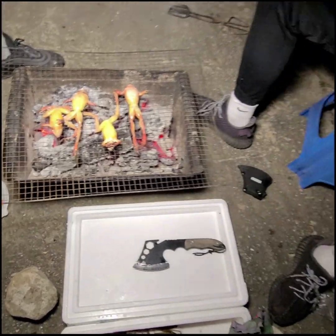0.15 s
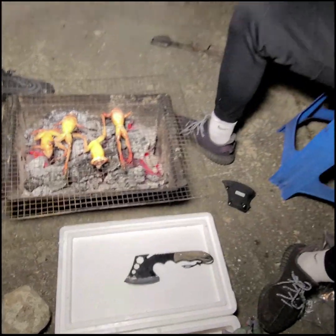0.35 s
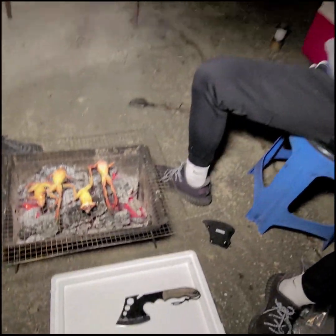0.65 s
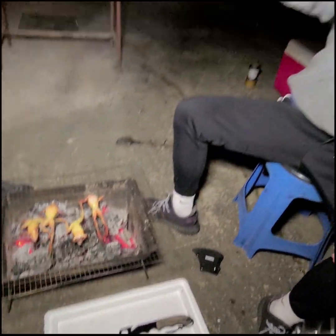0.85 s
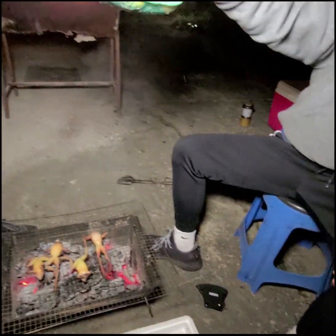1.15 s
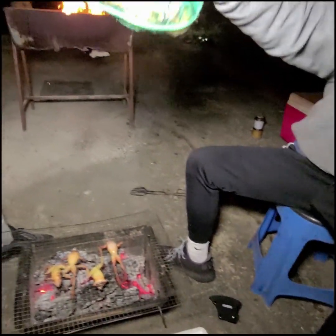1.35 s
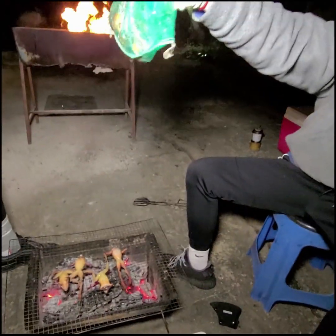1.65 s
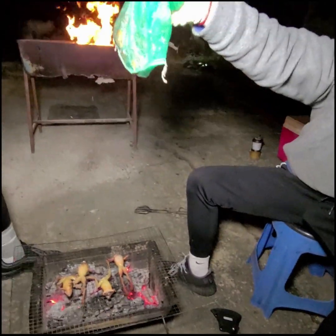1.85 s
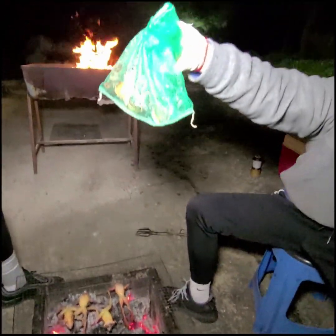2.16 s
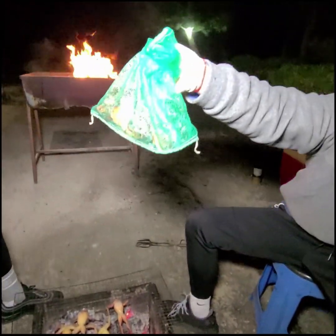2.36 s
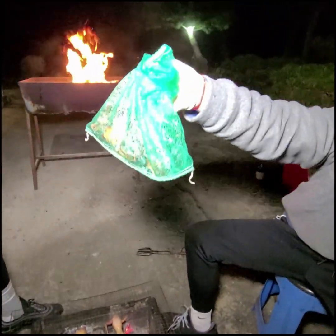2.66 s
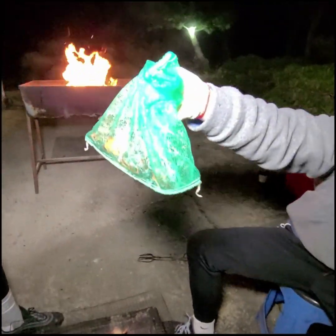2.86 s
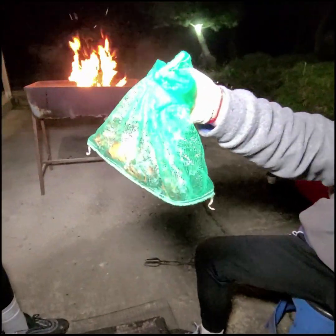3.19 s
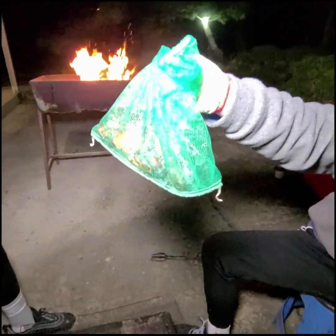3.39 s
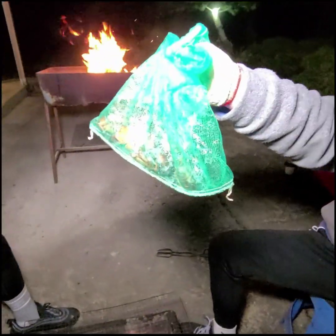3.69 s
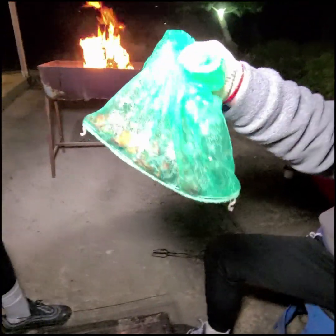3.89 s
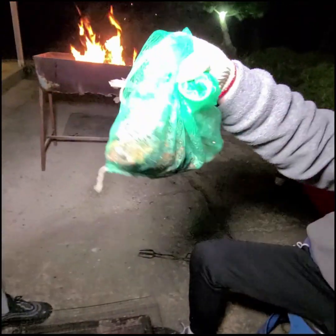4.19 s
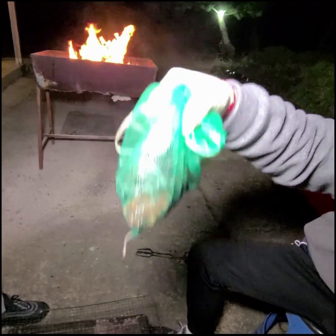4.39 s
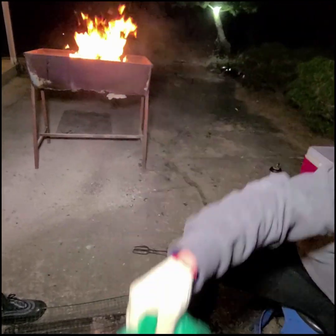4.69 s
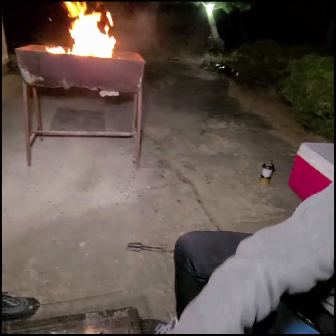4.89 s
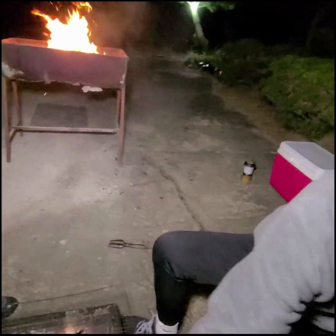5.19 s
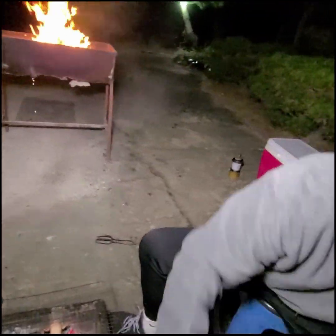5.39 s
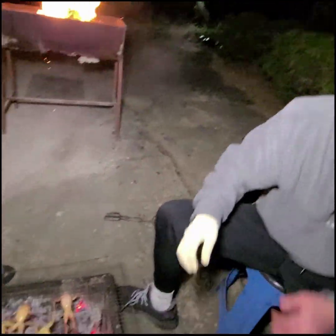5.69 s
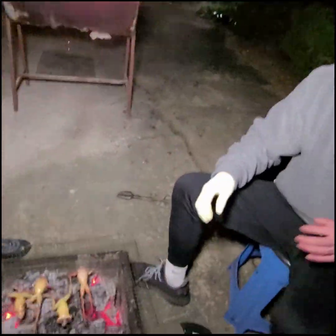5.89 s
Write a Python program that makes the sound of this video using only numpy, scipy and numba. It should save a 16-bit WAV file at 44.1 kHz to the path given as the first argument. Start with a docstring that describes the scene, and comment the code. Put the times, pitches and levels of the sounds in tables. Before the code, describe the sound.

A charcoal and wood fire crackles a metre or two from a hand-held stereo microphone in an open concrete yard. From 0 to 2 seconds pops are dense and sharp, with strong snaps near 0.4 to 0.6, at 0.9 to 1.0, and the loudest, slightly clipped, at about 1.65, leaning left. Short bright hisses follow some cracks; thin fizz and a soft flame roar waver beneath. A plastic shell creaks with a narrow, nasal squeak at 0.4 to 1.0 and again at 1.45 to 2.2. Clear pops land at 2.1, 2.4 and 3.3, with quieter ticks between. After a sparse patch and a faint rustle near 3.8, snaps cluster at 4.15 to 4.3; a light swish follows at 4.5. At 5.3 a bag lands with a dull, low knock, a quick rattle and rustle. Small crackles finish by 6 seconds, with slight low air buffeting.

```python
"""Charcoal fire in a concrete yard

Charcoal and a wood fire crackle at night, a metre or two from a hand-held stereo microphone.
Pops are short noise bursts with a ground echo and yard tail; hisses and embers are noise with tiny crackles.
A creaking plastic shell is jerks through moving resonances; a bag set down knocks struck modes and rustles.
Air on the microphone ports is low noise with a wandering level."""
import sys
import numpy as np
from scipy import signal
from scipy.fft import rfft, irfft
from scipy.io import wavfile
from scipy.ndimage import uniform_filter1d
from numba import njit

SR = 44100
rng = np.random.default_rng(int(sys.argv[2]) if len(sys.argv) > 2 else 0)


def gain_from_db(level_db):
    """Convert decibel levels to linear amplitude factors (20 dB per decade)."""
    decades = np.asarray(level_db, float) / 20
    return 10 ** decades


def generate_wav(signal):
    """Clip the signal to [-1, 1] and save it as 16-bit WAV at the path in sys.argv[1]."""
    frames = np.transpose(np.atleast_2d(signal))
    scaled = np.clip(frames, -1, 1) * 32767
    pcm = np.round(scaled).astype(np.int16)
    wavfile.write(sys.argv[1], SR, pcm)


N = 266584
T = np.arange(N) / SR


def level(x, db):
    """Scale to an rms level in dB."""
    return x * gain_from_db(db) / np.sqrt(np.mean(x ** 2))


def band(x, low_hz, high_hz):
    """Butterworth band-pass."""
    return signal.sosfilt(signal.butter(2, [low_hz, high_hz], "band", fs=SR, output="sos"), x)


def colour(x, spectrum):
    """Give white noise a spectrum, drawn straight in dB over log frequency."""
    hz, db = np.transpose(spectrum)
    log_hz = np.log(np.arange(N // 2 + 1) * SR / N + 1)
    gain = gain_from_db(np.interp(log_hz, np.log(hz), db))
    return irfft(rfft(x) * gain, N)


def curve(table, column):
    """One column of a table against time."""
    rows = np.array(table)
    return np.interp(T, rows[:, 0], rows[:, column])


def walk(count):
    """Random levels, count of them a second, smoothed twice; spread near 1."""
    k = int(SR / count)
    steps = np.repeat(rng.standard_normal(N // k + 1), k)
    return 1.3 * uniform_filter1d(uniform_filter1d(steps, k), k)[:N]


def pair(likeness):
    """Noise at the two ports, alike by a share of 0 to 1."""
    mid, side = rng.standard_normal((2, N))
    share = np.clip(likeness, 0, 1)
    return np.sqrt(1 + share) * mid + np.sqrt(1 - share) * side * np.array([[1], [-1]])


def grains(rate, spread_db):
    """Scattered clicks, rate of them a second, most of them small, a few large."""
    chance = rng.random((N, 3)).T
    size_db = np.minimum(-spread_db * np.log(1 - chance[1]), 3 * spread_db)
    return (chance[0] < rate / SR) * gain_from_db(size_db) * np.sign(chance[2] - .5)


def sides(pan_db):
    """Gains of left and right, pan_db apart."""
    return gain_from_db(np.array([pan_db, -pan_db]) / 2)


def swell(start, length, rise, fall):
    """Gain that rises exponentially, holds and dies away."""
    return np.exp(np.minimum(0, np.minimum((T - start) / rise, (start + length - T) / fall)))


@njit
def ring(x, hz, width):
    """State-variable band-pass with a moving centre, width in Hz, gain 1."""
    y, b, l = np.empty(len(x)), 0., 0.
    for i in range(len(x)):
        g, k = np.tan(np.pi * hz[i] / SR), width / hz[i]
        v = (b + g * (x[i] - l)) / (1 + g * (g + k))
        b, l, y[i] = 2 * v - b, l + 2 * g * v, k * v
    return y


def pops():
    """A cell bursts: a snap, splinters, an echo from the ground, a short tail from the yard."""
    # single bursts: (start [s], strength [dB], lows and air relative to it [dB], left minus right [dB])
    cells = [(0.0317, -30, -23, 2, -1), (0.0508, -20.5, -12, 2.5, 2.5), (0.0598, -23.5, -27, -4, -8),
             (0.064, -28, -9, -3, 0.0), (0.083, -23, -25, -2, 1), (0.0962, -27, -23, 0, -1.0),
             (0.1048, -25, -4.5, 1.5, 2.0), (0.1439, -29.5, -17, -3, 0.5), (0.163, -28.5, -39, 3, 3),
             (0.2088, -33.5, -23, -9, -2), (0.2453, -39.5, -23, 3, -0.5), (0.314, -30, -6.5, 7.5, -3.5),
             (0.3424, -23, -18.5, 4, -0.5), (0.3595, -26.5, -19, -6, -2.0), (0.405, -32, -23, -1, 2),
             (0.4183, -15, -6, 1.5, -1.5), (0.4976, -12.5, -12, 5.5, 1), (0.5892, -25.5, -23, 8, -4),
             (0.5993, -11.5, -19, -0.5, -0.5), (0.6365, -39, -15, -4, -1.5), (0.668, -34, -22, 5, -5),
             (0.6988, -31, -16, -3, -6), (0.716, -28, -13, 10, -5), (0.7212, -20, -2, 12, 5),
             (0.8037, -20, -12.5, -5, 4.0), (0.8215, -29, -24, 3, 0.5), (0.9384, -10, -11, 1.5, -0.5),
             (0.9988, -26.5, -3, -7, 5), (1.016, -8.5, -15, 1.5, 1), (1.069, -18, -7, 6, 6),
             (1.0889, -25, -34, 6, 2), (1.1136, -33.5, -24, 5, -5), (1.1302, -36, -13, -4, 1),
             (1.147, -29, -7.5, -1, 0), (1.199, -39, -16, 5, -0.5), (1.282, -15, -10.5, -0.5, 7.5),
             (1.3621, -25, -14, 0.5, 1.5), (1.4583, -34.5, -18, 5, 1.0), (1.4711, -32, -5, -4, -1.5),
             (1.5368, -31, -11, -23, -4), (1.6197, -30, -3, -14, -4), (1.642, -11.5, -15.5, -12, 4.5),
             (1.6568, -4.5, -17.5, -1, 5), (1.6757, -24, -10, -5, 3), (1.6866, -11.5, -13, -3, 7),
             (1.71, -12.5, -25, -1.5, -2), (1.7773, -30.5, -26, 4, 1), (1.7963, -36, -20, 0, -3.5),
             (1.8188, -28.5, -11, -4, 0.5), (1.8986, -34, -18, 1, -3.5), (1.924, -31, -20, -2, -3),
             (1.9762, -33.5, -12, 2, -1.0), (2.0038, -34, -13, -1, 3), (2.1208, -12, -14, -2, 2),
             (2.2189, -26, -14.5, 5, -3), (2.2929, -25.5, -14.5, 2.5, 0), (2.372, -13, -11.5, -15, 0),
             (2.4385, -38, -20, 2, 4), (2.4665, -30.5, -16.5, -6, 1), (2.505, -25, -13, -6, -3.5),
             (2.6115, -32, -15, -2.5, 0), (2.6424, -34, -10, -6, -1.5), (2.7608, -54.5, -4, 26, -11),
             (2.7874, -27.5, -11.5, 0, 2.5), (2.8325, -40, -17, -9, -3.0), (2.847, -37, -16, -10, -1.5),
             (2.865, -44, -12, -2, 3), (2.8851, -36, -19, 12, -3), (2.9021, -33.5, -28, 2, 1),
             (2.9759, -24, -20.5, -5, -1.5), (3.0086, -29, -15, 0.5, 0), (3.1038, -35, -18, 0, -0.5),
             (3.115, -37, -14, -4, 5), (3.1402, -20.5, -9.5, -5, 0), (3.2091, -27, -14.5, -10, 0.5),
             (3.2615, -50.5, 2.5, 10, -4), (3.2875, -9, -13, -9.5, -2.5), (3.3942, -35.5, -29, -8, -2),
             (3.416, -38, -6.5, -17, -1), (3.5161, -41, -10, 7, -4), (3.5535, -40.5, -14, -13, -1),
             (3.8205, -35, -22, 2, -7.5), (3.854, -37.5, -25, 4, 3.5), (3.8722, -38.5, -12, 7.5, -2),
             (3.9399, -33.5, -19, 1, 2), (3.9672, -31, -9, 2.5, 2.0), (4.0144, -36.5, -24, 3, 2),
             (4.1454, -16, -11, -3.5, 1.5), (4.2266, -24, -15, -10, 0), (4.2472, -16.5, -15, 1, 6.5),
             (4.2859, -15.5, -10, 4, 5), (4.345, -48, -22, -6, 1.5), (4.357, -30, -33, -6, -1.5),
             (4.5447, -23.5, -16.5, 0.5, 3.5), (4.6603, -30.5, -16, 5, 0), (4.834, -29, -12.5, 1.5, -2.0),
             (4.864, -30, -23, -0.5, -5), (4.9161, -33.5, -11, -4, 4.5), (4.9591, -32, -13, 5.5, 0),
             (4.9906, -41.5, -9, -5, 2.5), (5.024, -35.5, -7.5, -9, 0), (5.0479, -42.5, -3, -2, 4),
             (5.219, -20.5, -0.5, 12, 3), (5.2811, -21.5, -8, -13, 0), (5.3425, -28, -11, -7, 0),
             (5.411, -45, -11, 7, 2), (5.438, -33.5, -16, 5, -4), (5.4979, -29, -9.5, 4.5, -0.5),
             (5.5814, -34.5, -10.5, 3, 2), (5.661, -42.5, -21, -15, 6), (5.7688, -20, -15.5, -1.5, -3),
             (5.8588, -19.5, -4.5, 2, 6), (5.9963, -48, -19, 11, 3), (6.029, -37.5, -27, -1, 1)]
    # body, crack, snap and air: (low edge [Hz], high edge [Hz], likeness of the ports [0-1])
    pop_bands = [(250, 1200, .8), (1200, 3300, .3), (3000, 8500, 0), (10500, 18000, 0)]
    # echo and tail in each band: (gain [dB])
    yard_gains = [-8, -4, -3.5, -1.5]
    # weight of body, crack, snap and air: (gain [dB])
    band_gains = [8, 13, 9, 12]
    s, peak_db, lows_db, air_db, pan_db = np.vstack([cells, small_pops(count=50)]).T
    t = np.arange(4096) / SR - .001  # the snap peaks 1 ms in
    chance = rng.standard_normal((len(s), 3 * len(t) + 2))
    noise = chance[:, 2:].reshape(len(s), 3, -1)

    after = np.abs(t) * np.where(t < 0, 4., 1)  # rises four times as fast as it falls
    snap = np.exp(-after / 0.00025) + gain_from_db(1.5) * np.exp(-after / 0.0014)
    from_echo = np.abs(t - .0085 - .0006 * chance[:, :1, None])
    echo = gain_from_db(-17 + 3 * chance[:, 1:2, None]) * np.exp(-from_echo / .001)
    tail = gain_from_db(-17) * np.exp(-np.abs(t) / 0.022) * (t > 0)

    tilts_db = np.add([lows_db, lows_db, 0 * s, air_db], np.c_[band_gains])
    bursts = 0
    for (low_hz, high_hz, alike), db, yard_db in zip(pop_bands, tilts_db, yard_gains):
        ports = np.sqrt(alike) * noise[:, :1] + np.sqrt(1 - alike) * noise[:, 1:]
        # every snap carries its full energy in every band
        bare = band(ports[..., :300] * snap[:300], low_hz, high_hz)
        energy = np.sum(bare ** 2, axis=2, keepdims=True)
        shape = snap + gain_from_db(yard_db) * (echo + tail)
        shaped = band(ports * shape, low_hz, high_hz) / np.sqrt(energy)
        # neighbouring bands join without a notch when their signs alternate
        bursts = -bursts + shaped * gain_from_db(peak_db + db)[:, None, None]

    out = np.zeros((2, N + len(t)))
    for at, burst, gains in zip((s * SR).astype(int), bursts, sides(pan_db).T):
        out[:, at:at + len(t)] += burst * gains[:, None]
    return out[:, :N]


def small_pops(count):
    """Lesser cells burst at random, each with its own colour and place."""
    at = rng.random((count, 1)) * N / SR
    chance = rng.standard_normal((count, 4))
    # usual value and spread of strength, lows, air and left minus right, in dB
    return np.hstack([at, [-48, -14, 3, 0] + chance * [3, 6, 8, 4]])


def hisses():
    """Gas hisses on from a fresh crack: bright, spitting jets of noise that fade."""
    # jets: (start [s], level [dB], fade [s])
    gas_jets = [(.05, -47, .06), (0.419, -39.5, 0.08), (0.496, -32.5, 0.033), (.6, -52, .06),
                (.722, -39, 0.083), (0.941, -37, 0.048), (1.02, -47, .05), (1.07, -43, 0.097),
                (1.283, -48.5, 0.1), (1.657, -46, 0.051), (2.122, -36, 0.032), (3.288, -62, 0.022),
                (4.286, -42.5, 0.04), (5.219, -58, 0.032), (5.859, -47.5, 0.039)]
    jets = sum(gain_from_db(db) * np.exp(-np.abs(T - s) / fade) * (T > s) for s, db, fade in gas_jets)
    smear = np.exp(-np.arange(200) / SR / .0006)
    spit = np.convolve(np.abs(grains(400, 2)), smear)[:N]
    spray = pair(0) * (0.5 + level(spit, -7.5))
    return level(band(spray, 2500, 13000), 0) * jets


def embers():
    """Fizz of tiny crackles over a smooth hiss, and the low roar of the flames."""
    # glow of the fire: (time [s], fizz level [dB], roar level [dB])
    glow = [(0.0, -55, -63.5), (0.35, -61.5, -71), (0.57, -43.5, -66.5), (1.01, -55.5, -65.5),
            (1.36, -51.5, -67.5), (1.7, -45.5, -60.5), (1.92, -49, -61.5), (2.35, -57, -72),
            (2.57, -56, -69), (3.03, -68.5, -70.5), (3.63, -65, -70.5), (4.07, -59, -65.5),
            (4.41, -58, -72.5), (4.74, -67.5, -68.5), (5.1, -62, -69.5), (5.38, -50.5, -61.5),
            (5.55, -66.5, -69.5), (6.04, -57, -64)]
    # colour of the fizz: (frequency [Hz], density [dB per Hz])
    fizz_colour = [(500, 12), (1000, 8), (2000, -1), (4000, 4.5), (7400, 9.5), (8600, -6), (12000, 7),
                   (16000, -3.5)]
    # colour of the flames: (frequency [Hz], density [dB per Hz])
    roar_colour = [(60, -17), (110, -3), (200, -10), (400, -9), (800, -15.5), (1500, -14.5), (3000, -20.5),
                   (6000, -32)]
    smear = np.exp(-np.arange(400) / SR / .001)
    crackle = np.convolve(np.abs(grains(200, 3.4)), smear)[:N] * pair(0)
    hiss = level(pair(0), 0) * gain_from_db(1.5 * walk(40))
    roar = pair(.6) * gain_from_db(1.5 * walk(15))
    sizzle = hiss + level(crackle, 2.3)
    fizz = level(colour(sizzle, fizz_colour), 0) * gain_from_db(curve(glow, 1))
    return fizz + level(colour(roar, roar_colour), 6.03) * gain_from_db(curve(glow, 2))


def creak(row, lag_ms, pan_db):
    """Stick-slip jerks ring a plastic shell; the far port hears them later."""
    # strongest slips: (time [s], strength [dB])
    slips = [(0.4186, -39), (0.648, -55), (0.841, -53), (1.4726, -39.5), (1.4786, -42), (1.497, -45),
             (1.508, -47), (1.5817, -44), (1.5997, -39), (1.62, -32), (1.6355, -36.5), (1.7432, -53),
             (1.8397, -45), (1.864, -50), (1.8923, -47), (1.915, -51), (1.9368, -50), (2.0128, -53),
             (2.088, -52)]
    start, length, db, first_hz, last_hz = row
    hz = np.interp(T, [start, start + length], [first_hz, last_hz])
    chatter = level(grains(600, 2.5), 0) + 2.03 * rng.standard_normal(N)
    sag_db = -9 * np.clip(T - start, 0, length)  # 9 dB a second
    waver_db = 2 * walk(count=25)  # the pressure wavers
    jerks = chatter * gain_from_db(db + sag_db + waver_db) * swell(start, length, rise=0.021, fall=0.042)
    jerks = jerks / np.sqrt(150 / SR)  # the ring passes a narrow share of the chatter
    for s, peak_db in slips:
        # a single jerk loses most of its height in the narrow ring
        jerks[int(s * SR)] += gain_from_db(peak_db + 53.5) * (start < s < start + length)
    main = ring(ring(jerks, hz, 90.), hz, 220.)
    low_hz = .42 * hz
    low = ring(ring(jerks, low_hz, 120.0), low_hz, 190.0)
    shell = main + gain_from_db(-20) * low
    left = np.roll(shell, int(round(lag_ms * SR / 1000)))
    return np.array([left, shell]) * sides(pan_db)[:, None]


def knocks():
    """Each blow rings the same modes, strongest near the pitch that its spot and hardness favour."""
    # the bag and other soft bumps: (time [s], strength [dB], favoured pitch [Hz])
    blows = [(0.288, -45.5, 221), (0.634, -46, 500), (0.8, -58, 1780), (0.997, -48.5, 1360),
             (1.5, -39.5, 210), (2.624, -60.5, 1130), (4.184, -54, 334), (4.517, -56, 730),
             (4.579, -54, 537), (4.692, -43.5, 260), (4.787, -61.5, 1130), (5.044, -45, 400),
             (5.283, -30, 600), (5.294, -16.5, 267), (5.304, -35.5, 720), (5.316, -28, 214),
             (5.328, -35.5, 540), (5.343, -49, 708), (5.359, -44.5, 670), (5.379, -49.5, 1570),
             (5.392, -54.5, 1580), (5.428, -53.5, 695), (5.446, -61, 690), (5.474, -59, 700),
             (5.487, -62, 760), (5.527, -63, 690), (5.633, -50.5, 334)]
    # modes that every blow rings: (frequency [Hz], gain [dB], fall by 60 dB [s])
    modes = [(116, 14, 0.033), (229, 1, 0.056), (338, 1.5, 0.05), (564, 0, 0.11), (694, 11, 0.037),
             (778, 13.5, 0.023), (1270, 18, 0.033), (1580, 18, 0.03), (2380, 16, 0.04)]
    t = np.arange(8192) / SR
    hz, db, t60 = np.transpose(modes)[:, :, None]
    decay = np.exp(-np.log(1000) * t / t60)
    onset = 1 - np.exp(-t / 0.0013)
    out = np.zeros((2, N + len(t)))
    for s, peak_db, spot_hz in blows:
        chance = rng.standard_normal((3, 2, len(hz), 1))
        away_db = 15 * np.abs(np.log2(hz / spot_hz))  # 15 dB an octave
        # chance[0] is shared by the ports, chance[1] and chance[2] differ between them
        gain = gain_from_db(peak_db + db - away_db + 2 * chance[0, 0] + chance[1])
        phase = .2 * chance[2] + chance[0, 0]
        tone = np.sin(2 * np.pi * hz * (1 + .02 * chance[0, 1]) * t + phase)
        blow = np.sum(gain * tone * decay, axis=1) * onset
        out[:, int(s * SR):int(s * SR) + len(t)] += blow
    return out[:, :N]


def rustle():
    """The bag rustles and drags: dense scratches of mesh and cloth, as noise and clicks."""
    # strokes: (start [s], length [s], level [dB])
    drags = [(3.817, 0.13, -57), (4.485, 0.12, -55), (5.194, 0.016, -50.5), (5.292, 0.02, -47),
             (5.312, 0.069, -46.5)]
    scratch = level(pair(0.16), 0) + level(grains(620, 1), -3.2)
    strokes = sum(gain_from_db(db) * swell(s, length, rise=0.0092, fall=0.017) for s, length, db in drags)
    return level(band(scratch, 270, 4500), 0) * strokes


def wind():
    """Slow air buffets each port mostly on its own."""
    # strength of the air: (time [s], level [dB])
    air = [(0.0, -54), (0.12, -53), (0.27, -62), (0.45, -46), (0.87, -45), (0.91, -56), (1.36, -64.5),
           (1.43, -55), (2.09, -58.5), (2.12, -43.5), (2.25, -63.5), (5.0, -60), (5.25, -52), (5.28, -50),
           (5.37, -65.5), (5.8, -56.5), (5.84, -42.5), (6.04, -51)]
    # colour of the buffets: (frequency [Hz], density [dB per Hz])
    buffet_colour = [(8.8, -60), (15, -7), (70, 1), (85, 0.5), (140, -21), (200, -17.5), (260, -24),
                     (440, -120)]
    gusts = level(colour(pair(.15), buffet_colour), 1)
    flutter_db = 3.5 * walk(14)
    pan_db = 5 * walk(6.9) - 2.0  # wanders between the ports
    return gusts * gain_from_db(curve(air, 1) + flutter_db) * sides(pan_db)


def scene():
    """All sources at the two ports of the microphone."""
    # creaks: (start [s], length [s], drive level [dB], first ring [Hz], last ring [Hz])
    creak_rows = [(0.398, 0.61, -52.5, 1120, 1170), (1.457, 0.72, -55, 1172, 1300)]
    # place of each creak: (lag of the left port, negative when it leads [ms], left minus right [dB])
    creak_places = [(-.4, 3), (.31, -3)]
    creaks = sum(creak(row, *place) for row, place in zip(creak_rows, creak_places))
    return pops() + hisses() + embers() + wind() + creaks + knocks() + rustle()


def roll_off(x):
    """The treble ends steeply here."""
    return signal.sosfilt(signal.butter(12, 17140, fs=SR, output="sos"), x)


def record(dry):
    """The loudest pops overload the input and clip; the top above 15.85 kHz is cut."""
    ceiling = .78  # of full scale
    clipped = np.clip(dry, -ceiling, ceiling)
    top = signal.ellip(8, .2, 60, 15850, fs=SR, output="sos")
    return roll_off(signal.sosfilt(top, clipped))


dry = scene()
out = record(dry)
generate_wav(out)
```